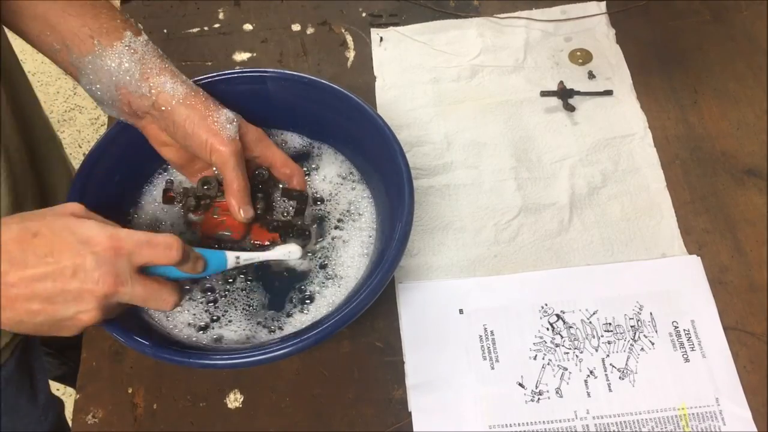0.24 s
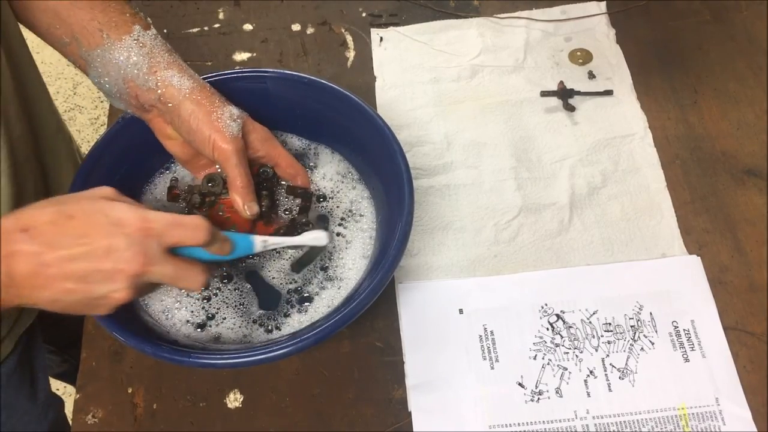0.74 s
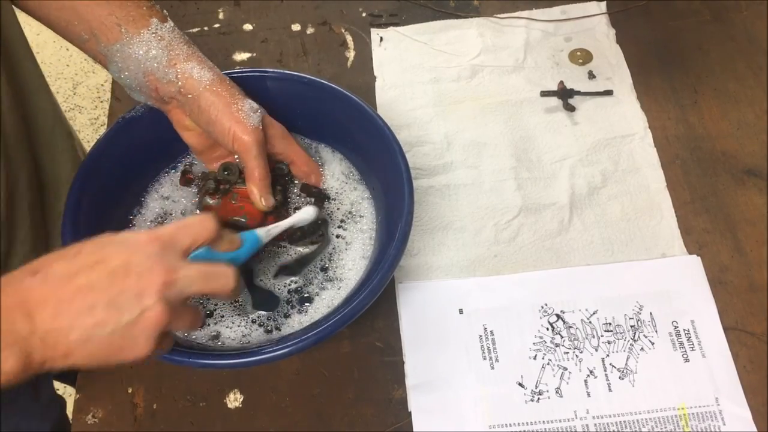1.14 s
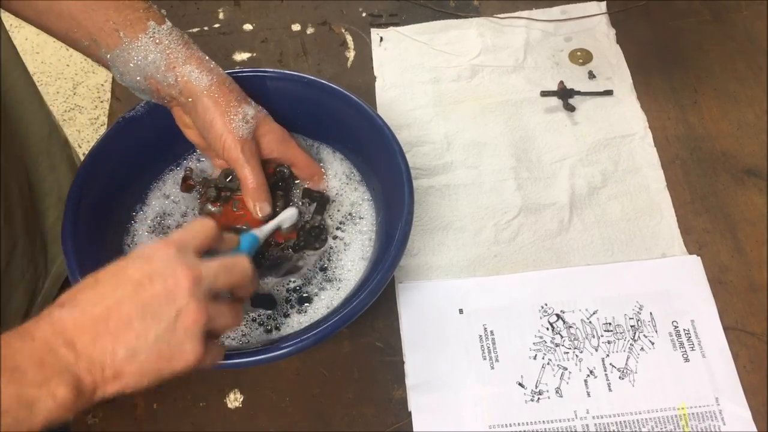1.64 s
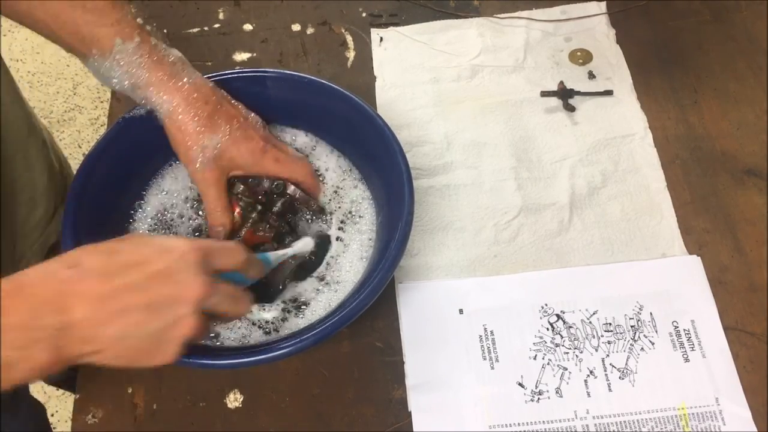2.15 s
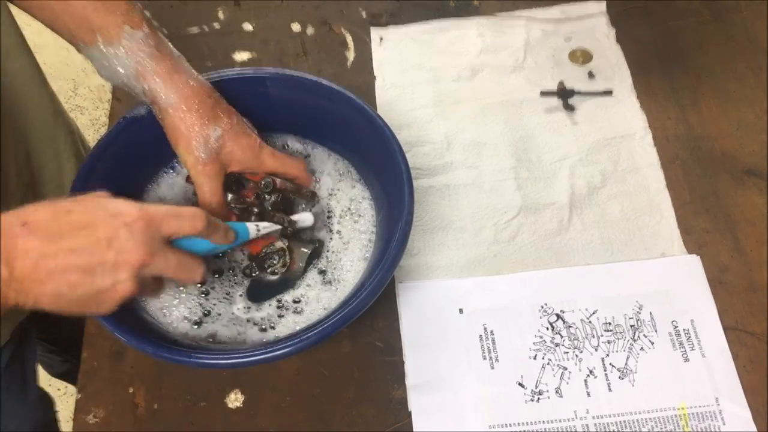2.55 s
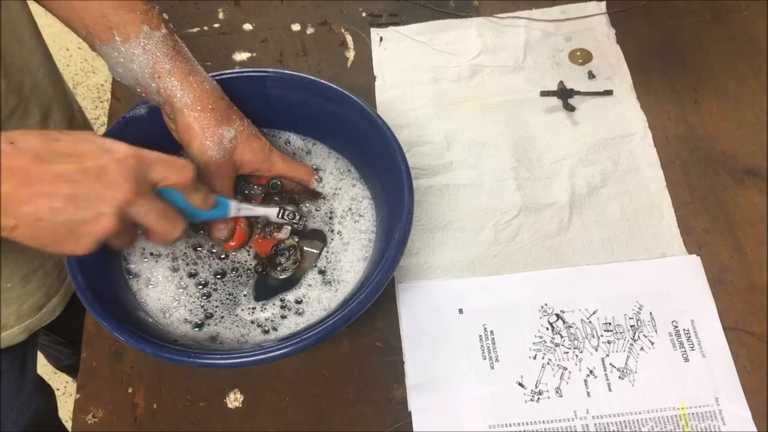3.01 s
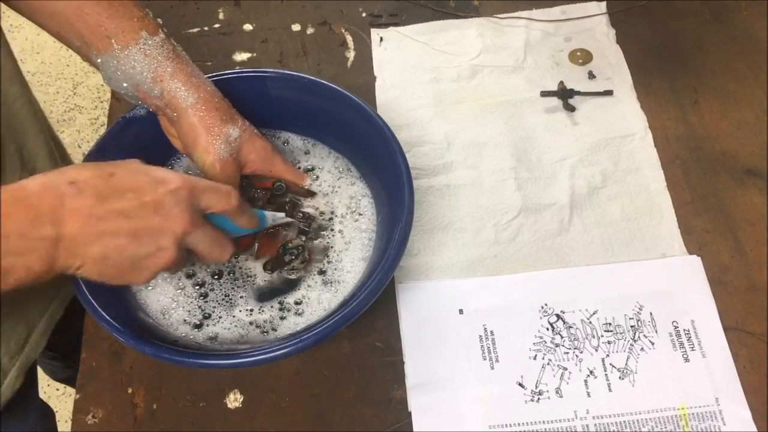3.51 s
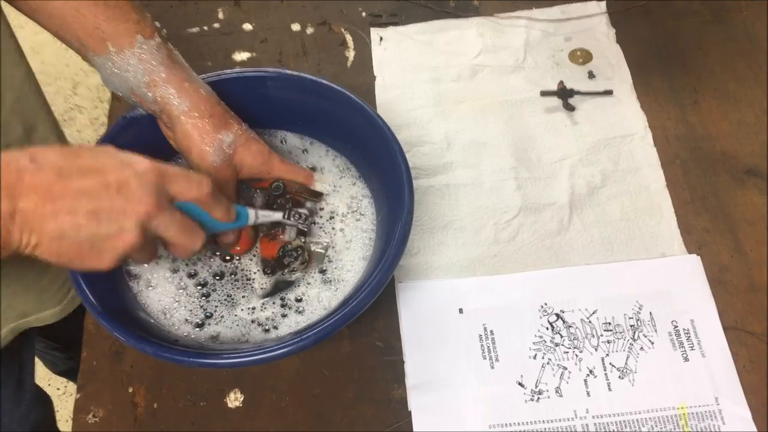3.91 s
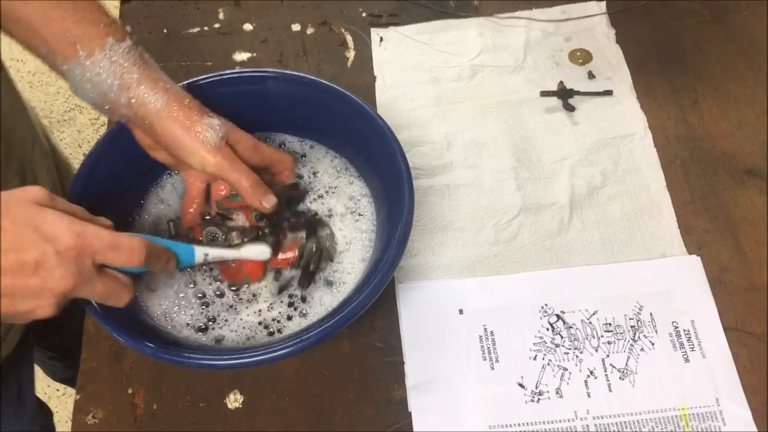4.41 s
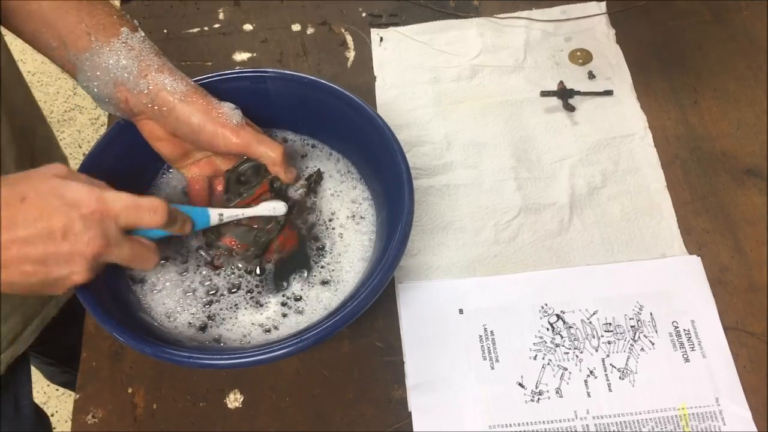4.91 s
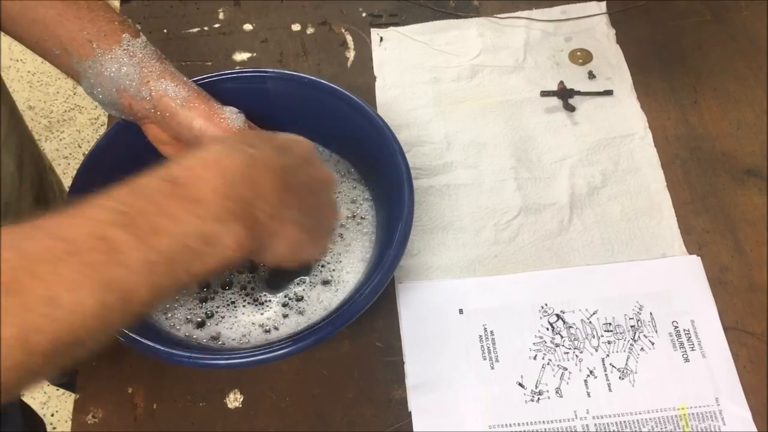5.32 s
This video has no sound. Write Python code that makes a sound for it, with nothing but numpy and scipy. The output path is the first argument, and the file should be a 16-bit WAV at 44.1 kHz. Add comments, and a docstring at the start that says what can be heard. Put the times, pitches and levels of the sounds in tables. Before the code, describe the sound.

A battery toothbrush buzzes and scrubs a small metal part in a plastic bowl of soapy water, with constant hollow knocks and scrapes.

```python
"""A buzzing battery toothbrush scrubs a small metal engine part in a plastic bowl of soapy water.
Its head rattles twice a motor turn (gated noise) and hisses on each sweep (the dull noise swells).
The part knocks and scrapes: blows and random slips ring short hollow bowl modes and thud the bench.
Around it: metal ticks, grinding slips, a stick-slip squeak, low bumps, bubble chirps, a wash of suds."""
import sys
import numpy as np
from scipy import signal
from scipy.fft import rfft, irfft, next_fast_len
from scipy.io import wavfile
from scipy.ndimage import uniform_filter1d

SR = 44100
rng = np.random.default_rng(int(sys.argv[2]) if len(sys.argv) > 2 else 0)


def store_pcm(level_fs):
    """Save levels as 16-bit WAV."""
    pcm = np.round(np.clip(level_fs, -1, 1) * 32767).astype(np.int16)
    wavfile.write(sys.argv[1], SR, np.atleast_2d(pcm).T)


N = 245176


def amp(db):
    """Decibels to gain."""
    return 10 ** (np.asarray(db) / 20)


def evened(x):
    """Scales to rms 1."""
    return x / np.sqrt(np.mean(x ** 2) + 1e-20)


def column(table, k):
    """Column k of a breakpoint table, interpolated at every sample."""
    rows = np.array(table)
    return np.interp(np.arange(N) / SR, rows[:, 0], rows[:, k])


def add(mix, start_s, sound):
    """Mixes a sound in at start_s, in place."""
    part = mix[max(round(start_s * SR), 0):][:len(sound)]
    part += sound[:len(part)]


def coloured(x, points):
    """Filters x by a curve of (Hz, dB), interpolated over log frequency; rms 1."""
    f, db = np.transpose(points)
    size = next_fast_len(N)
    hz = np.fft.rfftfreq(size, 1 / SR)
    curve_db = np.interp(np.log(hz + 1), np.log(f + 1), db)
    return evened(irfft(rfft(x, size) * amp(curve_db), size)[:N])


def smooth_twice(x, count, axis=-1):
    """Two moving averages over count points."""
    return uniform_filter1d(uniform_filter1d(x, count, axis), count, axis)


def drift(count):
    """Slow chance, rms 1, smooth over count samples."""
    return evened(smooth_twice(rng.standard_normal(N), count))


def patchy(x, patchy_db, count):
    """Random time-frequency patches, patchy_db rms, smoothed over count frames; rms 1."""
    z = signal.stft(x, nperseg=256)[2]
    field = smooth_twice(rng.standard_normal(z.shape), count, 1)
    field = evened(uniform_filter1d(field, 5, 0))
    return evened(signal.istft(z * amp(patchy_db * field), nperseg=256)[1][:N])


def ring(modes, rise_s, pitch=1, count=4500):
    """Decaying modes answering one click; heavy walls take a moment to swing up."""
    t = np.arange(count) / SR
    swings = 0
    for hz, db, t60_s in modes:
        swings = swings + amp(db - 60 * t / t60_s) * np.sin(2 * np.pi * pitch * hz * t)
    return (1 - np.exp(-t / rise_s)) * swings


# bristle sweeps: t/s, peak level/dB, length/s
SWEEPS = [(0.125, -42, 0.033), (0.17, -33, 0.081), (0.245, -32.5, 0.029), (0.312, -32.5, 0.06),
          (0.392, -33, 0.059), (0.479, -29.5, 0.04), (0.635, -30.5, 0.038), (0.698, -31.5, 0.048),
          (0.758, -32, 0.081), (0.834, -33, 0.088), (0.946, -30, 0.04), (0.996, -35.5, 0.066),
          (1.116, -33, 0.055), (1.168, -30.5, 0.066), (1.262, -34.5, 0.066), (1.345, -30.5, 0.031),
          (1.413, -30, 0.039), (1.48, -31, 0.038), (1.742, -37, 0.11), (1.827, -39, 0.043),
          (1.933, -38, 0.09), (2.041, -29.5, 0.073), (2.1, -32.5, 0.045), (2.199, -33.5, 0.062),
          (2.253, -31, 0.081), (2.38, -32.5, 0.022), (2.414, -31.5, 0.088), (2.508, -27, 0.053),
          (2.599, -26.5, 0.041), (2.763, -33, 0.044), (2.821, -32, 0.053), (2.911, -28, 0.051),
          (2.9951, -35, 0.053), (3.061, -27.5, 0.024), (3.128, -28, 0.038), (3.193, -27, 0.02),
          (3.248, -29.5, 0.087), (3.317, -28, 0.063), (3.4088, -29, 0.038), (3.482, -28.5, 0.045),
          (3.541, -29, 0.072), (3.734, -35, 0.039), (3.808, -32, 0.061), (3.897, -29, 0.067),
          (3.969, -27.5, 0.035), (4.049, -25.5, 0.028), (4.1026, -30.5, 0.059), (4.182, -31, 0.073),
          (4.25, -28.5, 0.035), (4.305, -32, 0.062), (4.3949, -37, 0.12), (4.446, -30, 0.035),
          (4.5546, -31, 0.025), (4.6, -33, 0.061), (4.681, -33, 0.071), (4.7511, -35, 0.071),
          (4.799, -26, 0.024), (4.8756, -31, 0.033), (4.928, -35, 0.029), (4.997, -34, 0.05),
          (5.0947, -31.5, 0.046), (5.1684, -30, 0.053), (5.2555, -34, 0.037), (5.316, -34, 0.051),
          (5.409, -35.5, 0.049), (5.492, -32.5, 0.045)]
SWEEP_OFFSET_S = -0.006  # a sweep starts this far from its listed time
PUSH_EXTRA_S = 0.013  # a push outlasts its sweep


def pushing():
    """Brush drag on the part: 0 between sweeps, swelling to 1 during each."""
    push = np.zeros(N)
    for s, _, length_s in SWEEPS:
        swell = np.hanning(round(max(length_s + PUSH_EXTRA_S, .01) * SR))
        add(push, s + SWEEP_OFFSET_S, swell)
    return np.minimum(push, 1)


# spectrum of suds and room: f/Hz, relative level/dB per Hz
WASH_SPECTRUM = [(15, -77), (25, -90), (200, 7), (320, 11.5), (395, -7), (489, 10), (644, 0), (924, -74),
                 (1300, -21), (1640, -12), (2400, -13.5), (3380, -4), (4000, -74), (5200, -63),
                 (8800, -120)]
# the part grinding on the bowl between knocks: t/s, deep level/dB, upper level/dB
GRIND = [(0.0, -45, -47), (0.36, -59.5, -60), (0.59, -44.5, -42), (0.84, -45, -42), (0.99, -42, -50.5),
         (1.22, -56.5, -54), (1.36, -36.5, -31), (1.59, -46.5, -51), (1.95, -43, -47.5), (2.06, -55, -73),
         (2.29, -47, -51.5), (2.6, -50, -50), (2.82, -47, -51), (3.79, -42.5, -47), (4.12, -44, -52),
         (4.54, -60, -61), (4.8, -51, -50), (4.95, -40, -37.5), (5.23, -51, -59), (5.37, -35, -62),
         (5.56, -75, -60)]
WASH_DB, SLOSH_REST_DB = -52, -2.5  # base level; drop between sweeps


def suds_and_room():
    """Faint noise wash, stirred up by the scrubbing: follows grind level and sweeps."""
    deep_db = column(GRIND, 1)
    effort_db = 0.17 * (deep_db - np.mean(deep_db))
    slosh_db = 2.6 * drift(count=1200) + SLOSH_REST_DB * (1 - pushing())
    wash = patchy(coloured(rng.standard_normal(N), WASH_SPECTRUM), 4.2, count=8)
    return amp(WASH_DB + effort_db + slosh_db) * wash


# bubbles in the suds: t/s, onset f/Hz, peak level/dB, length/s
BUBBLES = [(0.431, 1630, -57, 0.024), (2.138, 1630, -52, 0.019), (2.742, 1560, -39, 0.0091),
           (4.413, 2900, -60, 0.035), (5.414, 1610, -55, 0.029), (2.27, 2560, -52, .03)]


def bubbles():
    """Short sine tones that rise 6.6 % in pitch under a half-sine envelope."""
    out = np.zeros(N)
    for s, hz, db, length_s in BUBBLES:
        u = np.arange(round(length_s * SR)) / (length_s * SR)
        cycles = hz * length_s * u * (1 + 0.033 * u)
        add(out, s, amp(db) * np.sin(np.pi * u) * np.sin(2 * np.pi * cycles))
    return out


# the bowl rocks and bumps the bench: t/s, peak level/dB
BUMPS = [(.718, -28), (2.616, -31), (2.69, -24), (3.069, -37), (3.99, -37), (4.63, -36), (4.8, -47),
         (1.9, -44), (1.99, -42), (5.325, -38)]


def bumps():
    """One soft push of air per bump: a Gaussian pulse centred on its time."""
    out, u = np.zeros(N), np.arange(-800, 800) / SR / 0.011
    for s, db in BUMPS:
        add(out, s - 800 / SR, amp(db) * np.exp(-u ** 2))
    return out


# one squeak of the part along the wet wall: t/s, slip rate f/Hz, level/dB
SQUEAK = [(5.365, 198, -68), (5.385, 196, -37), (5.42, 206, -30.5), (5.435, 220, -51)]
# squeak harmonics: multiple of slip rate, relative level/dB
HARMONICS = [(1, -18), (2, 0), (3, -19), (4, -17)]


def squeak():
    """Steady stick and slip; the deep ring of the bowl favours the second harmonic."""
    cycles, t = np.cumsum(column(SQUEAK, 1)) / SR, np.arange(N) / SR
    tone = sum(amp(db) * np.sin(2 * np.pi * k * cycles) for k, db in HARMONICS)
    sounding = (t > SQUEAK[0][0]) * (t < SQUEAK[-1][0])
    return amp(column(SQUEAK, 2)) * evened(tone) * sounding


# bowl and bench modes, nominal: f/Hz, relative level/dB, t60/s
DEEP_MODES = [(309.4, -10.5, 0.049), (378, -36, 0.06), (402.5, 3, 0.11), (468.5, -15.5, 0.13)]
UPPER_MODES = [(638, 9.5, 0.037), (680, -15, 0.057), (790, -22, 0.082)]
BENCH_MODES = [(104, -12, 0.17), (142.3, -2, 0.13), (201, 3.5, 0.12)]
GRIND_REST_DB = -5.5  # slip level between sweeps


def grind():
    """Dense small random slips keep the bowl humming; they weaken between sweeps."""
    slips = rng.standard_normal(N) * (rng.random(N) < .03) * amp(3 * drift(count=500))
    slips = slips * amp(GRIND_REST_DB * (1 - pushing()))

    def rung(modes, rise_s):
        return evened(signal.oaconvolve(slips, ring(modes, rise_s))[:N])

    deep, upper = rung(DEEP_MODES, 0.0081), rung(UPPER_MODES, 0.0081)
    bench = rung(BENCH_MODES, 0.0074)
    return amp(column(GRIND, 1)) * (deep + amp(-19) * bench) + amp(column(GRIND, 2)) * upper


# brush head ticking on the metal: t/s, body peak level/dB, f/Hz, snap gain/dB re body
TICKS = [(1.272, -39.5, 2900, -22), (1.495, -38, 1780, -28), (1.681, -42, 3250, -20),
         (1.827, -33, 2700, -30), (1.8598, -35.5, 2320, -20), (1.9852, -21.5, 1330, -11),
         (2.1928, -40, 2523, -25), (2.2667, -48, 2620, -20), (2.3074, -36, 1600, -14),
         (2.6174, -36, 1590, -20), (2.7276, -56, 1610, -20), (2.8568, -43, 3200, -16),
         (3.0647, -28, 1700, -3), (3.138, -38.5, 2790, -20), (3.753, -34.5, 3280, -16),
         (3.9745, -32.5, 1610, -15), (4.049, -44, 3540, -22), (4.1175, -40.5, 3180, -20),
         (4.3009, -49, 3230, -22), (4.3207, -37, 2980, -12), (4.484, -31.5, 3340, -3),
         (4.611, -43.5, 1680, -24), (4.7504, -36.5, 3150, -14), (4.804, -27, 2900, -23),
         (4.935, -38, 2598, -36), (4.973, -34.5, 1900, -10), (5.175, -35, 1890, -20),
         (5.283, -36, 1668, -20)]


def ticks():
    """A decaying noise puff through a broad ring of the metal, plus its bright snap."""
    out, t = np.zeros(N), np.arange(1200) / SR
    for (s, db, hz, snap_db), noise in zip(TICKS, rng.standard_normal((len(TICKS), 1200))):
        puff = noise * amp(-60 * t / 0.044)
        body = np.convolve(puff, ring([(hz, 0, .005)], .0001, count=600))[:1200]
        snap = amp(snap_db) * np.diff(puff, prepend=0)
        add(out, s, amp(db) * (body / abs(body).max() + snap))
    return out


# hard edge modes of the knock: f/Hz, relative level/dB, t60/s
EDGE_MODES = [(1087, 9, 0.028), (1420, 9.5, 0.019), (1610, 7, 0.03), (1849, 1.5, 0.046), (2190, -1, 0.02),
              (2700, 0.5, 0.025), (3210, 8, 0.0077)]
# knocks of the part on the bowl: t/s, deep peak level/dB, upper, edge and bench levels/dB re deep,
# deep f/Hz, upper f/Hz (water and hand load the wall), scrape share/0-1, settling time/s (damps the wall)
KNOCKS = [(0.027, -40, 3, -31, -7, 418, 673, 0.58, 0.11),
          (0.147, -41.5, 7.5, -34, -4, 430, 654, 0.39, 0.059),
          (0.247, -37, -4.5, -27, -14, 400, 646, 0.42, 0.02),
          (0.324, -46, 7, -16, -1.5, 434, 667, 0.51, 0.041),
          (0.338, -45, 9.5, -21, -18, 374, 635, 0.44, 0.035),
          (0.411, -30.5, -1.5, -18, -17, 420, 638, 0.45, 0.055),
          (0.488, -30.5, 6.5, -10, -19, 426, 638, 0.52, 0.033),
          (0.552, -27.5, -10, -26, -18, 398, 622, 0.49, 0.047),
          (0.571, -31.5, 10.5, -12, -17, 398, 636, 0.51, 0.023),
          (0.624, -23, -12, -20, -28, 416, 634, 0.48, 0.033),
          (0.655, -29.5, 4.5, -20, -30, 413, 639.5, 0.35, 0.035),
          (0.713, -24, -5, -18.5, -28, 424, 638, 0.41, 0.024),
          (0.778, -41, -7, -20, -30, 460, 697, 0.74, 0.042),
          (0.794, -24, -4.5, -20, -33, 410, 630, 0.33, 0.048),
          (0.857, -25.5, -10, -26, -18.5, 420, 657, 0.5, 0.089),
          (0.934, -25, -8, -27, -23, 404, 630, 0.51, 0.024),
          (0.964, -27, -4, -29, -23, 405, 638, 0.37, 0.049),
          (1.017, -32.5, -10, -27, -24, 401, 687, 0.45, 0.032),
          (1.125, -41, 10.5, -11, -0.5, 430, 605, 0.71, 0.017),
          (1.155, -30.5, -5.5, -17, -21, 413, 615, 0.63, 0.076),
          (1.195, -23.5, -4.5, -12.5, -32, 423, 657, 0.35, 0.021),
          (1.204, -24, -1, -29, -31, 400, 647, 0.33, 0.067),
          (1.241, -29, -4, -13, -29, 389, 660, 0.3, 0.061),
          (1.274, -29.5, 3, -10, -30, 417, 638, 0.35, 0.086),
          (1.355, -23.5, -3.5, -16, -26, 404, 643, 0.39, 0.028),
          (1.426, -30.5, 3.5, -10.5, -16, 420, 687, 0.34, 0.037),
          (1.451, -34.5, -1, -11, -15, 407, 697, 1, 0.053),
          (1.494, -25, 1, -16, -36, 406, 610, 0.45, 0.026),
          (1.559, -22.5, -6.5, -21, -26, 388, 652, 0.37, 0.023),
          (1.659, -44, 5, -3, -24, 380, 633, 0.81, 0.094),
          (1.701, -21.5, -7, -24, -33, 381, 638, 0.28, 0.021),
          (1.749, -37, 1.5, -18, -21, 406, 660, 0.4, 0.045),
          (1.81, -32.5, -1, -16, -20, 375, 610, 0.49, 0.029),
          (1.83, -30, 2, -7, -10, 410, 630, 0.47, 0.048),
          (1.878, -21, -10.5, -19, -16, 358, 705, 0.59, 0.026),
          (1.987, -10, 2.5, -5.5, -28, 386, 613, 0.49, 0.012),
          (2.052, -35.5, 7.5, -0.5, -6, 353, 638, 0.31, 0.033),
          (2.114, -38, 3, -14, -16, 409, 652, 0.25, 0.017), (2.194, -45, 5, 1.5, -1, 356, 638, 0.33, 0.021),
          (2.228, -34, -13, -23, -16, 399, 606, 0.33, 0.023),
          (2.306, -30.5, 5, -3.5, -14, 434, 630, 0.77, 0.012),
          (2.406, -36.5, -3.5, -8, -16, 392, 645, 0.39, 0.033),
          (2.447, -30.5, -8, -25, -25, 404, 575, 0.54, 0.031),
          (2.478, -37, 6.5, -8, -22, 420, 624, 0.57, 0.017),
          (2.523, -19, -4.5, -20, -37, 399, 647, 0.39, 0.044),
          (2.607, -18, -1.5, -13.5, -24, 383, 587, 0.44, 0.014),
          (2.667, -31, -7, -31, -13, 420, 667, 0.56, 0.045),
          (2.698, -19, -7, -25, -21, 403, 642, 0.42, 0.018),
          (2.722, -16.5, -3, -17.5, -26, 383, 633.6, 0.41, 0.023),
          (2.822, -47, -19, -19, -17, 426, 660, 0.57, 0.026),
          (2.86, -35, -8, -30, -30, 388, 645, 0.36, 0.04),
          (2.914, -35, -1.5, -30, -17, 400, 563, 0.51, 0.072),
          (3.017, -39.5, -2, -28, -15, 377, 614, 0.67, 0.043),
          (3.064, -21, -3.5, -29, -17, 409, 600, 0.49, 0.025),
          (3.138, -28, 1.5, -13.5, -12, 386, 637, 0.63, 0.043),
          (3.198, -23, -3.5, -15.5, -22, 400, 638, 0.39, 0.019),
          (3.283, -40.5, -1.5, -11, -23, 395, 653, 0.42, 0.05),
          (3.351, -33, -12, -34, -10, 372, 623, 0.4, 0.02),
          (3.424, -33.5, 3.5, -30, -26, 416, 598, 0.44, 0.016),
          (3.51, -28, 1, -16.5, -28, 404, 626, 0.36, 0.017),
          (3.559, -29.5, -1, -9.5, -20, 408, 620, 0.4, 0.021),
          (3.583, -29.5, 3, -20, -28, 410, 600, 0.5, 0.022),
          (3.653, -32.5, -11, -25, -22, 406, 634, 0.38, 0.028),
          (3.739, -35.5, -18, -17, -30, 428, 657, 0.48, 0.059),
          (3.761, -31, -5, -11, -13.5, 409, 623, 0.4, 0.024),
          (3.831, -31, -9, -19, -7.5, 414, 580, 0.29, 0.024),
          (3.89, -35.5, -1.5, -28, -22, 378, 638, 0.58, 0.035),
          (3.926, -28, -11, -32, -25, 394, 650, 0.56, 0.07),
          (3.984, -19.5, -10.5, -23, -27, 384, 657, 0.35, 0.022),
          (4.051, -30.5, 1.5, -18, -26, 390, 573, 0.44, 0.055),
          (4.077, -38, -14, -30, -30, 394, 615, 0.36, 0.035),
          (4.111, -23, -3.5, -22, -23.5, 394, 626, 0.49, 0.058),
          (4.235, -35.5, 0, -36, -24, 418, 640, 0.18, 0.035),
          (4.269, -29.5, -9, -38, -28, 410, 645, 0.36, 0.035),
          (4.299, -31, -5, -23, -32, 391, 663, 0.4, 0.046),
          (4.322, -25.5, -5, -17.5, -17, 416, 605, 0.41, 0.027),
          (4.357, -29, -8, -27, -32, 401, 670, 0.38, 0.027), (4.445, -42, 3, -6, -5, 424, 660, 0.95, 0.03),
          (4.489, -28, 0, -21, -8.5, 382, 614, 0.34, 0.035),
          (4.565, -43, -11, -13, -5, 410, 650, 0.45, 0.032),
          (4.613, -34, 4.5, -13, -2, 412, 638, 0.37, 0.023),
          (4.712, -30, -4, -11, -19, 406, 640, 0.42, 0.029),
          (4.779, -18.5, 5, -9, -19, 380, 604, 0.36, 0.022),
          (4.811, -25, -7, -18, -18, 401, 624, 0.55, 0.013),
          (4.892, -24.5, -11, -41, -27, 412, 624, 0.49, 0.026),
          (4.938, -22.5, 0, -15.5, -26, 419.6, 669, 0.5, 0.1),
          (4.98, -19.5, 4.5, -11, -19, 410, 638, 0.34, 0.016),
          (5.035, -23.5, -6, -36, -38, 387, 590, 0.36, 0.032),
          (5.085, -31, -10, -13, -19, 393, 610, 0.39, 0.022),
          (5.11, -32.5, -8, -27, -10.5, 412, 637, 0.5, 0.049),
          (5.183, -33, -5, -32, -10, 423, 630, 0.37, 0.04),
          (5.258, -31.5, -4, -21, -15, 390, 577, 0.61, 0.064),
          (5.283, -28.5, 0, -10, -9.5, 354.5, 642, 0.49, 0.027),
          (5.296, -35, 15.5, -27, -13, 360, 622, 0.47, 0.018),
          (5.353, -18, -3, -17.5, -33, 387.4, 614, 0.37, 0.034),
          (5.473, -36.5, -6.5, -18, -24, 404, 643, 0.51, 0.026),
          (5.505, -46, 9, -17, -12, 394, 640, 0.4, 0.019),
          (5.539, -35.5, -17, -20, -23, 398, 641, 0.41, 0.029)]
DEEP_REF_HZ, UPPER_REF_HZ = 402, 638  # the knock's f over this retunes the mode bank
SCRAPE_S, SCRAPE_PER_SETTLE = 0.0045, 0.32  # scrape time scale: base + part of settling time


def knocks():
    """Each knock is a blow, then a short scrape of small slips, rung by bowl and bench."""
    edge, bench = ring(EDGE_MODES, 0.00035), ring(BENCH_MODES, 0.005)
    out, t, ring_t = np.zeros(N), np.arange(3000) / SR, np.arange(4500) / SR
    shape = len(KNOCKS), 3000
    slips = rng.standard_normal(shape) * (rng.random(shape) < .02)
    for knock, slip in zip(KNOCKS, slips):
        s, db, upper_db, edge_db, bench_db, deep_hz, upper_hz, share, settle_s = knock
        share = np.clip(share, 0, 1)
        u = t / max(SCRAPE_S + SCRAPE_PER_SETTLE * settle_s, .002)
        scrape = slip * u * np.exp(-u ** 2)
        scrape = share * scrape / (np.linalg.norm(scrape) + 1e-9)
        blow = (1 - share) * (t == 0)
        # deep and upper wall modes; then edge and bench, which lean more on the scrape
        wall_force = blow + 3.07 * share * scrape
        light_force = 0.42 * blow + scrape
        deep = ring(DEEP_MODES, 0.0024, deep_hz / DEEP_REF_HZ)
        upper = ring(UPPER_MODES, 0.0044, upper_hz / UPPER_REF_HZ)
        damped = np.exp(-(ring_t / max(settle_s, .005)) ** 4)
        for bank, rel_db, damping, force in ((deep, 0, damped, wall_force),
                                             (upper, upper_db, damped, wall_force),
                                             (edge, edge_db, damped, light_force),
                                             (bench, bench_db, 1, light_force)):
            sound = damping * signal.fftconvolve(force, bank)[:4500]
            add(out, s - .0008, amp(db + rel_db) * sound / abs(sound).max())
    return out


def rattle(phase, sharp, bed, spread_db, limp_db):
    """Noise gated by each rattle; rattles differ in size and every second one is weaker."""
    nth = phase.astype(int)
    size_db = spread_db * rng.standard_normal(N // 50)[nth] - limp_db * (nth % 2)
    gate = amp(size_db) * np.exp(sharp * (np.cos(2 * np.pi * (phase - .5)) - 1))
    return (bed + gate) * rng.standard_normal(N)


# brush motor: t/s, rattle rate f/Hz, bright level/dB before lift, dull level/dB between sweeps
MOTOR = [(0.0, 450, -40.5, -44.5), (0.25, 466, -41, -44.5), (1.52, 485, -41, -46.5),
         (1.87, 425, -39.5, -43), (2.21, 450, -40, -51), (2.38, 393, -42, -48), (2.51, 410, -42, -44),
         (3.16, 377, -41, -45.5), (3.73, 487, -42.5, -44.5), (4.13, 406, -39, -43.5), (4.18, 459, -41, -49),
         (4.65, 410, -43, -48), (4.85, 420, -42, -48), (4.95, 413, -42.5, -43.5), (5.17, 471, -42.5, -50),
         (5.56, 446, -42.5, -47.5)]
# head rattle spectrum: f/Hz, relative level/dB per Hz
BRIGHT_SPECTRUM = [(4120, -36), (7000, -9), (7780, -5.5), (9940, -1), (12000, -1), (15100, -4.5),
                   (15800, -3)]
# bristles on wet metal, spectrum: f/Hz, relative level/dB per Hz
DULL_SPECTRUM = [(2290, -18.5), (3900, -7.5), (4090, -12.5), (4490, 1), (4930, 2.5), (6370, 5.5),
                 (8000, -3), (10400, -4.5), (17600, -120)]
CREST_DB = 11.5  # rattle peaks above their mean level


def brush():
    """The motor's rattle, its dull part swelling as the bristles sweep the metal."""
    rate_hz = uniform_filter1d(column(MOTOR, 1), size=6000)  # the rotor's weight evens out the speed
    phase = np.cumsum(rate_hz * (1 + 0.03974 * drift(count=400))) / SR  # in rattles
    bright = coloured(rattle(phase, sharp=2.4, bed=0.75, spread_db=3.0, limp_db=1.5), BRIGHT_SPECTRUM)
    dull = coloured(rattle(phase, sharp=3.4, bed=0.27, spread_db=1.4, limp_db=2.5), DULL_SPECTRUM)
    power = amp(column(MOTOR, 3)) ** 2
    for s, db, length_s in SWEEPS:
        window = signal.windows.tukey(round(max(length_s, .01) * SR), .7)
        add(power, s + SWEEP_OFFSET_S, (amp(db - CREST_DB) * window) ** 2)
    press = np.sqrt(power)
    # pressing also lifts the bright rattle a little
    lift = (press / uniform_filter1d(press, 8000)) ** 0.45
    hiss = press * patchy(dull, 2.03, count=6)
    return hiss + amp(column(MOTOR, 2)) * lift * patchy(bright, 2.4, count=8)


def scene():
    """All sources; knocks, ticks, squeak and bubbles get a short tail from bench and walls."""
    near = knocks() + ticks() + squeak() + bubbles()
    t = np.arange(6000) / SR
    tail = rng.standard_normal(6000) * amp(-60 * t / 0.14) * (t > .004)
    wet = signal.oaconvolve(near, tail / np.linalg.norm(tail))[:N]
    return (near + amp(-10.5) * wet + bumps() + brush() + grind() + suds_and_room())[None]


BAND_LIMIT_HZ = 15760


def record(dry):
    """The microphone loses the deepest bass; then the band limit."""
    thin = signal.sosfilt(signal.butter(2, 85., "high", fs=SR, output="sos"), dry)
    lowpass = signal.firwin(1023, BAND_LIMIT_HZ, window=("kaiser", 9), fs=SR)
    return signal.oaconvolve(thin, lowpass[None], "same")


dry = scene()
out = record(dry)
store_pcm(out)
```